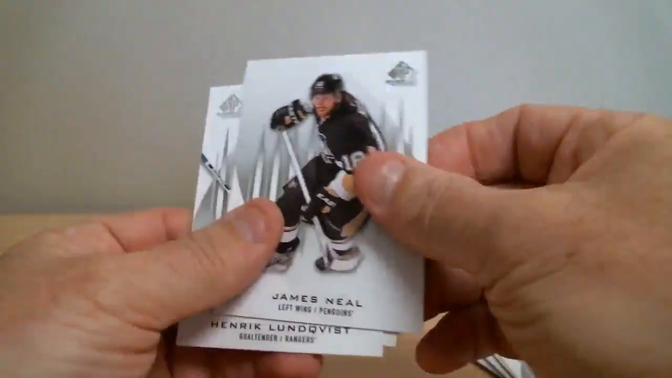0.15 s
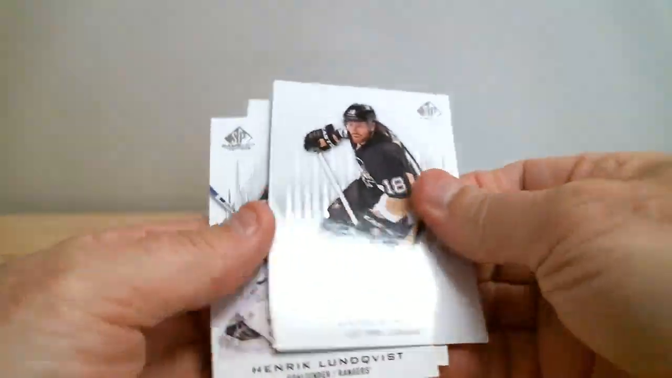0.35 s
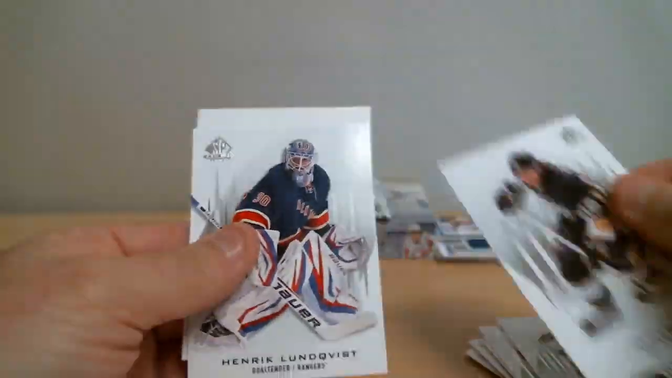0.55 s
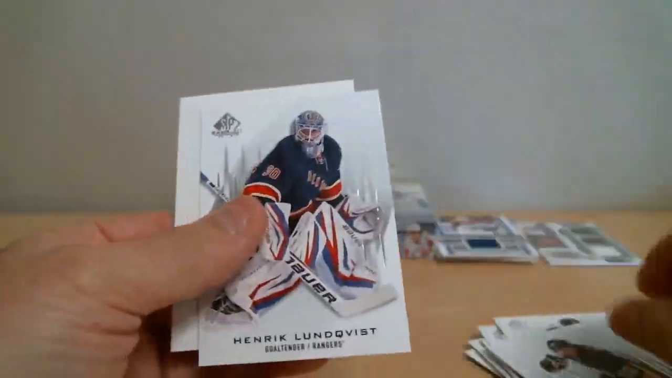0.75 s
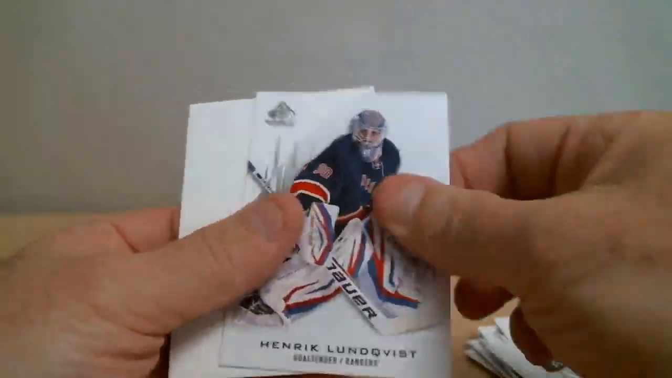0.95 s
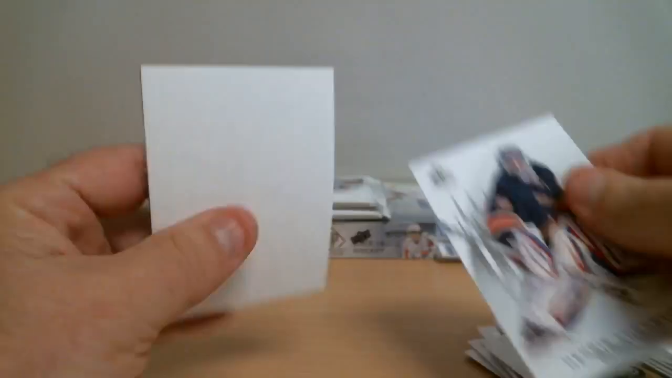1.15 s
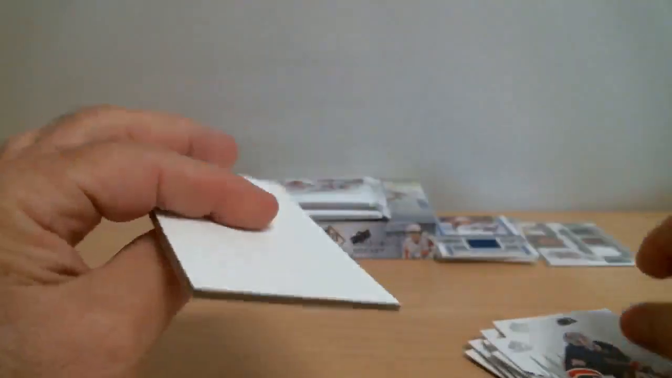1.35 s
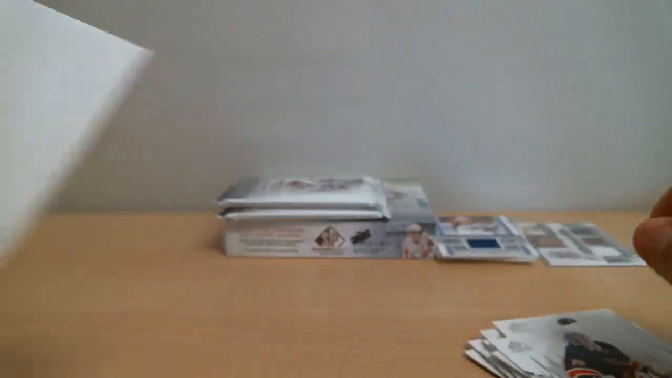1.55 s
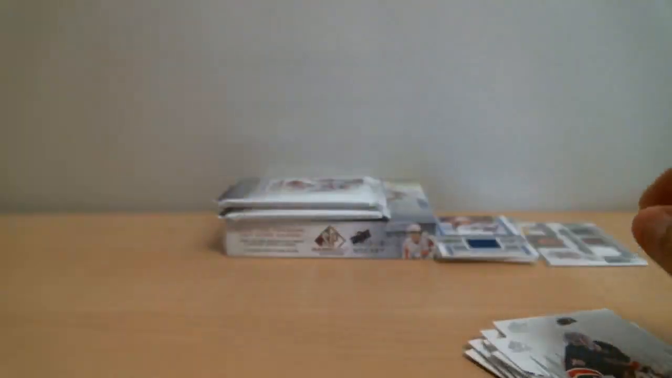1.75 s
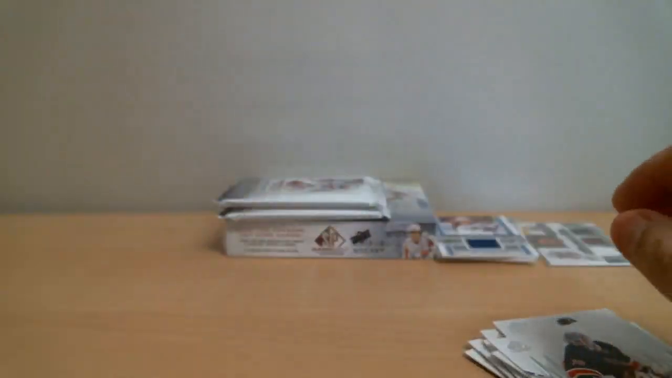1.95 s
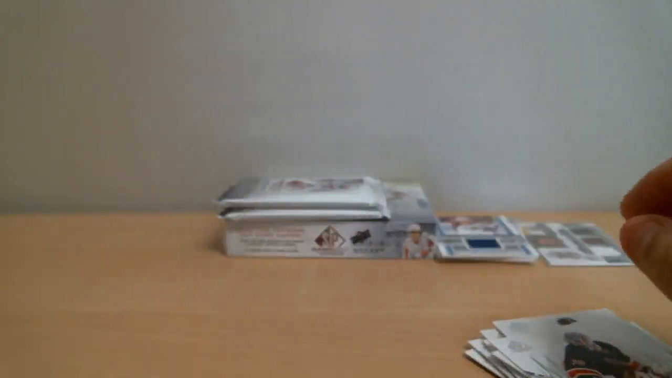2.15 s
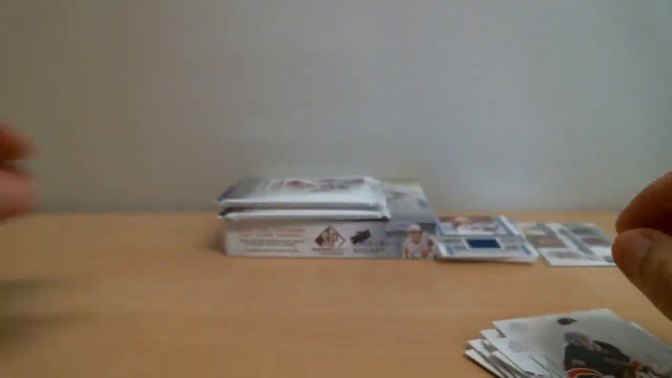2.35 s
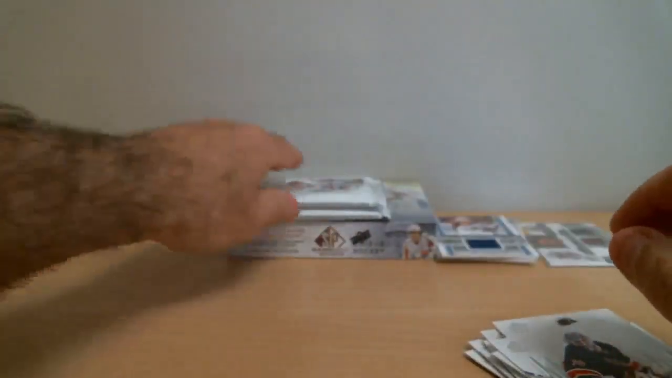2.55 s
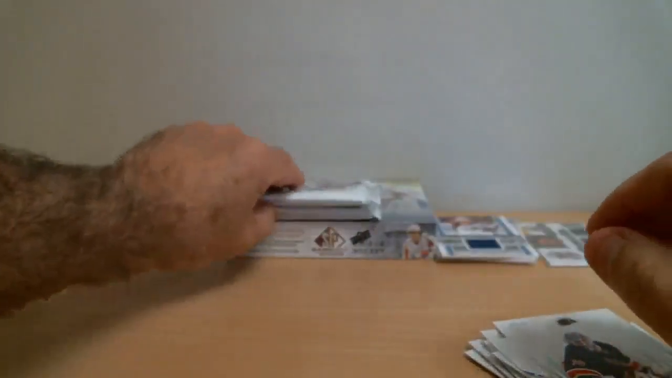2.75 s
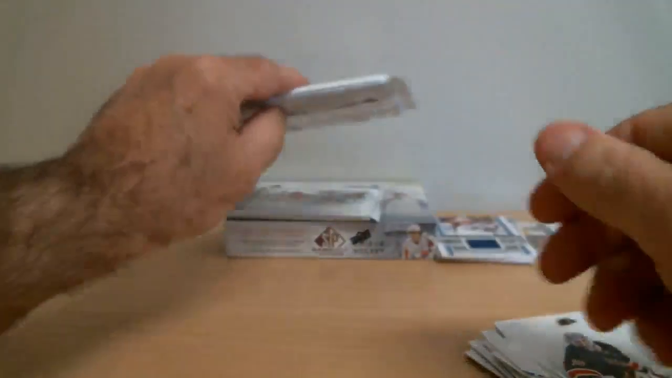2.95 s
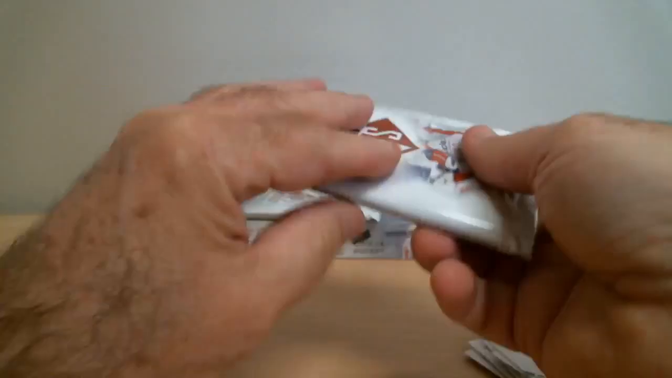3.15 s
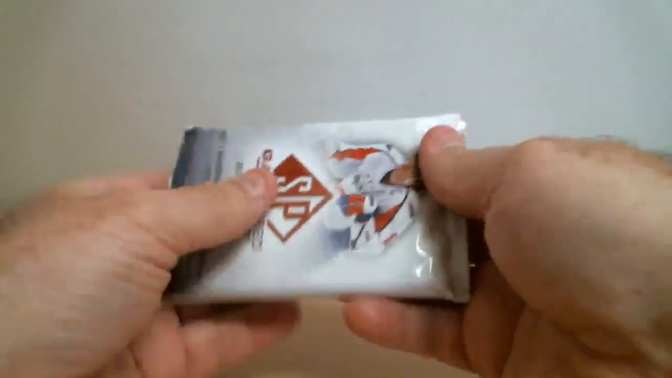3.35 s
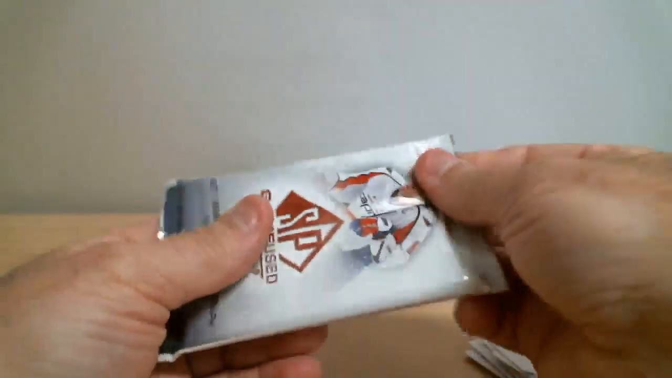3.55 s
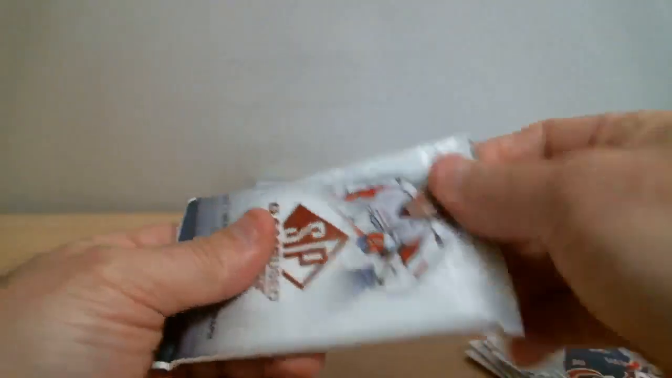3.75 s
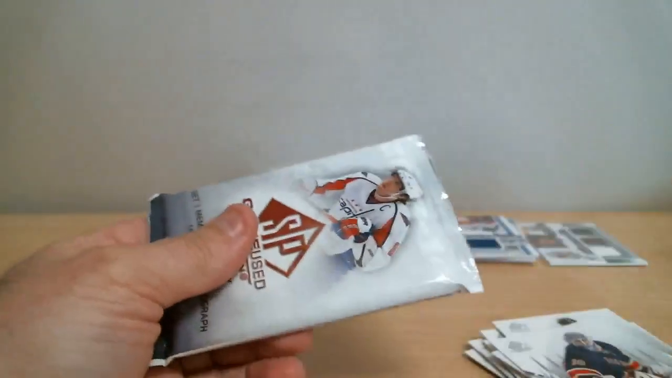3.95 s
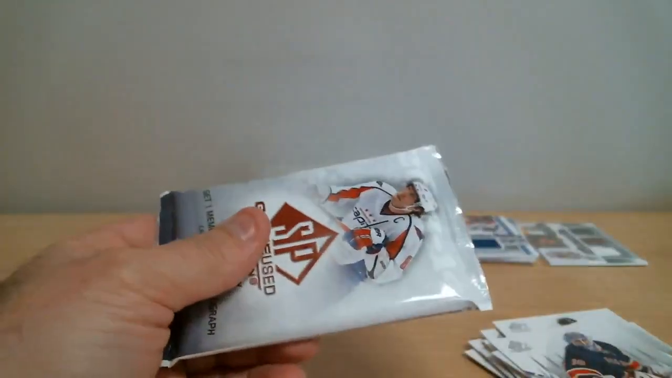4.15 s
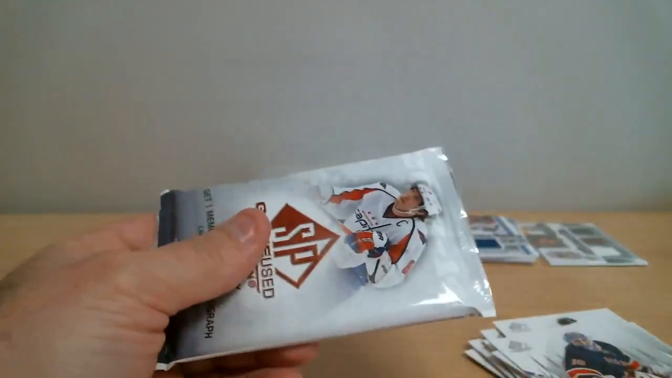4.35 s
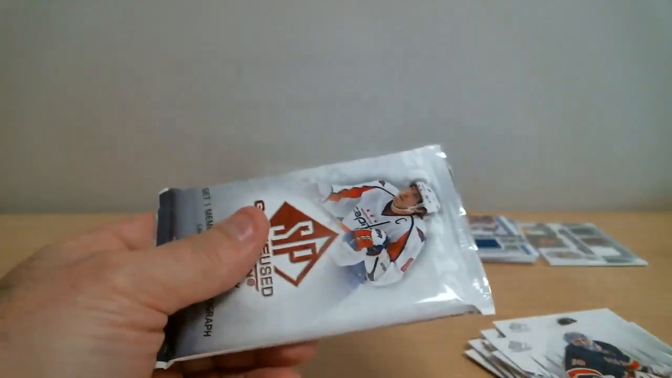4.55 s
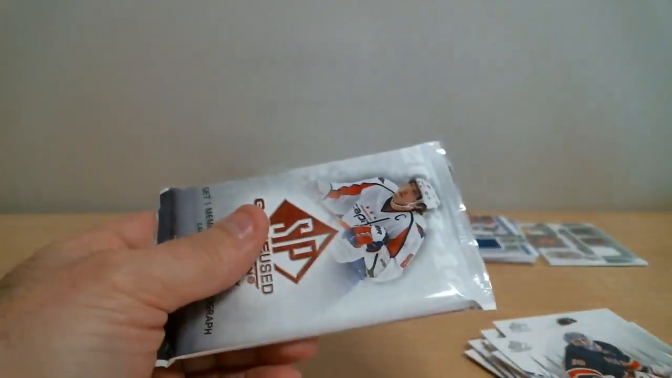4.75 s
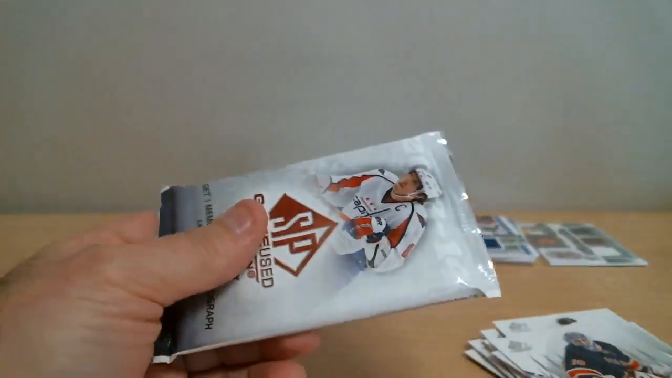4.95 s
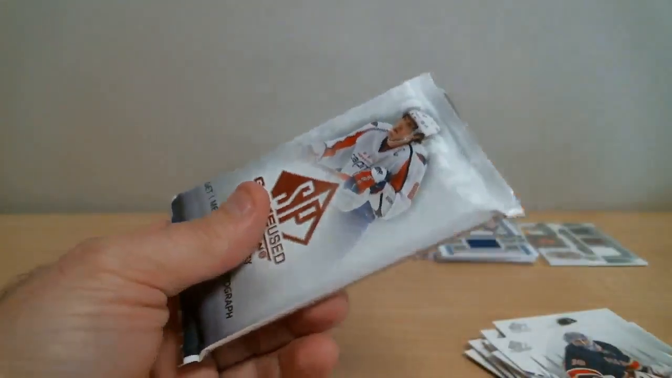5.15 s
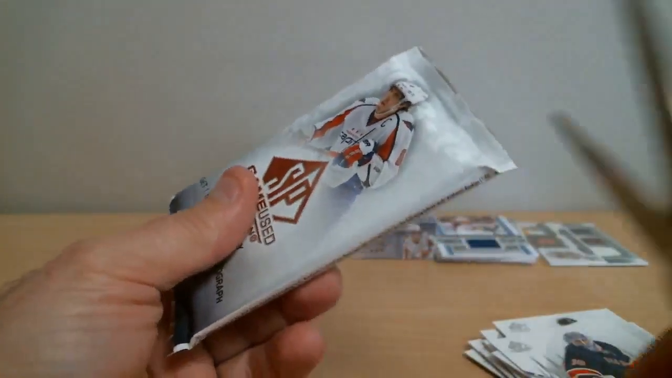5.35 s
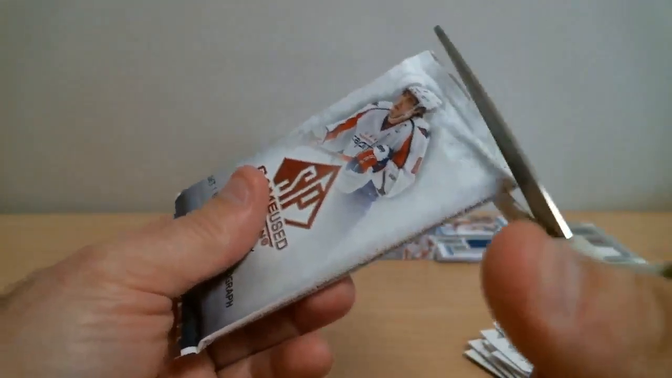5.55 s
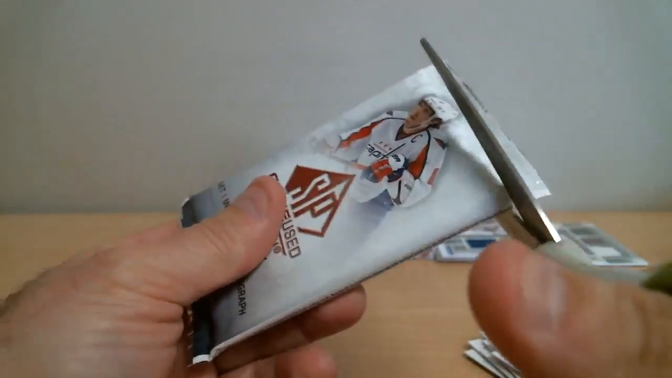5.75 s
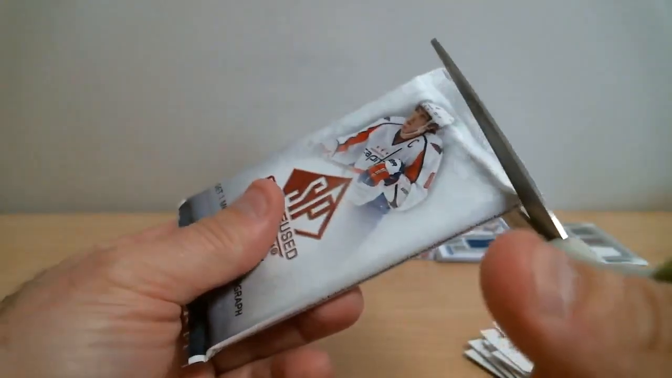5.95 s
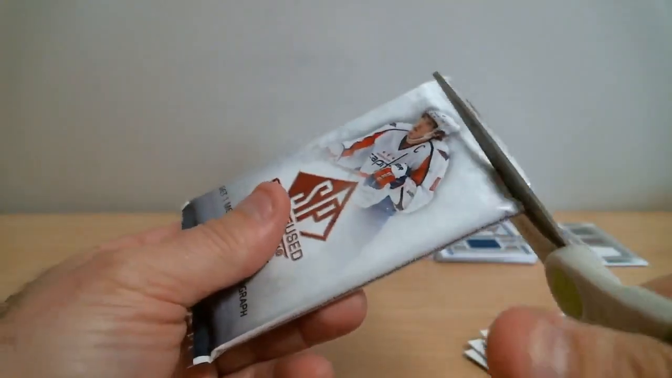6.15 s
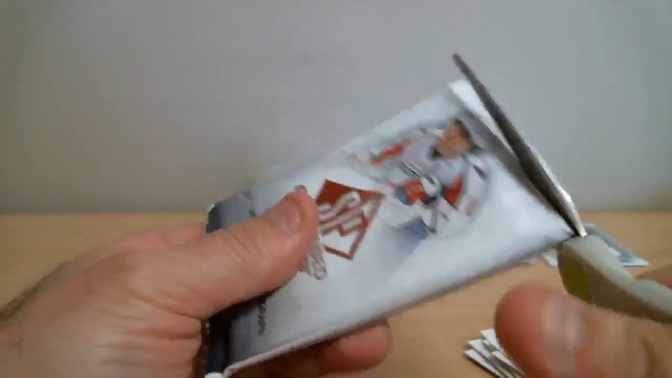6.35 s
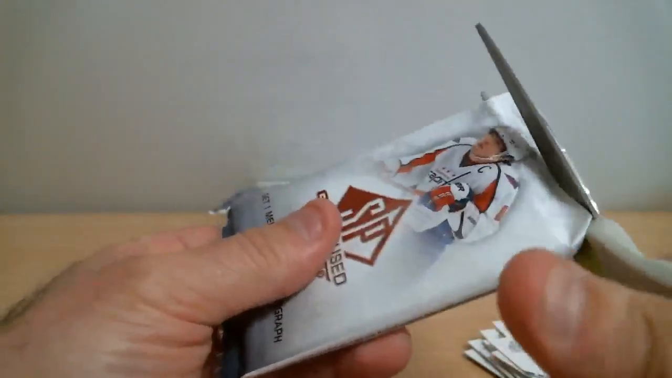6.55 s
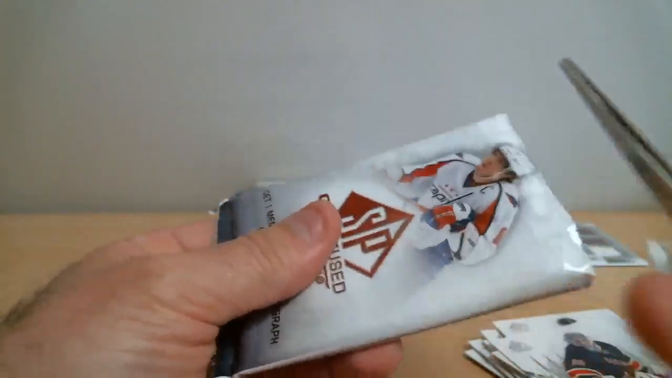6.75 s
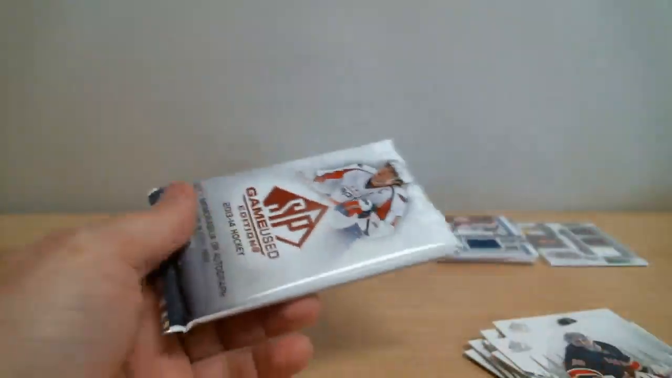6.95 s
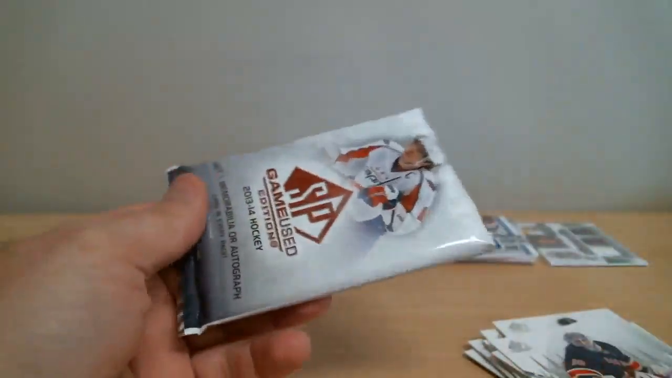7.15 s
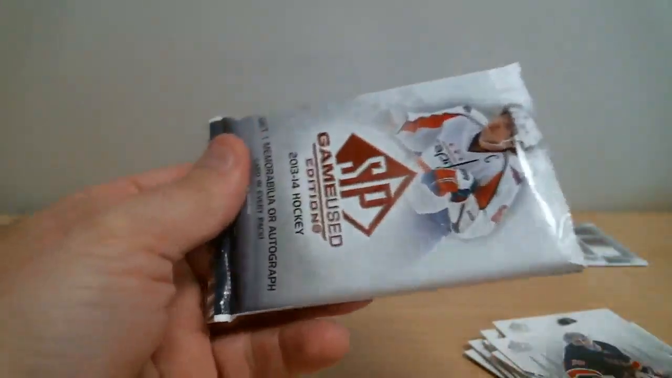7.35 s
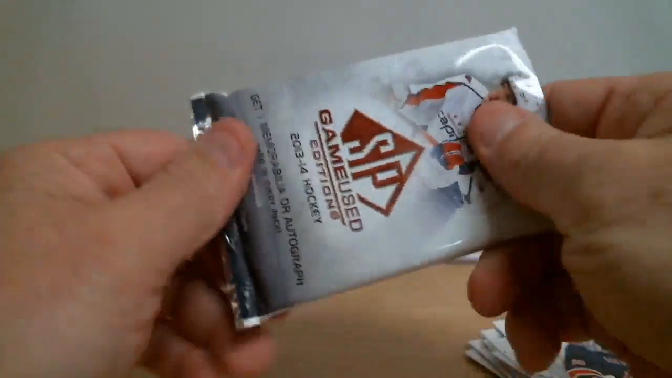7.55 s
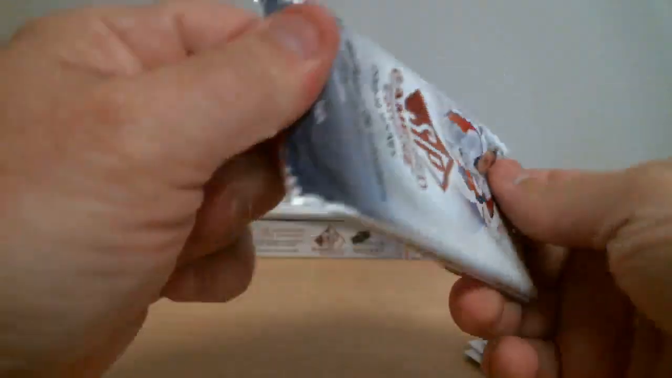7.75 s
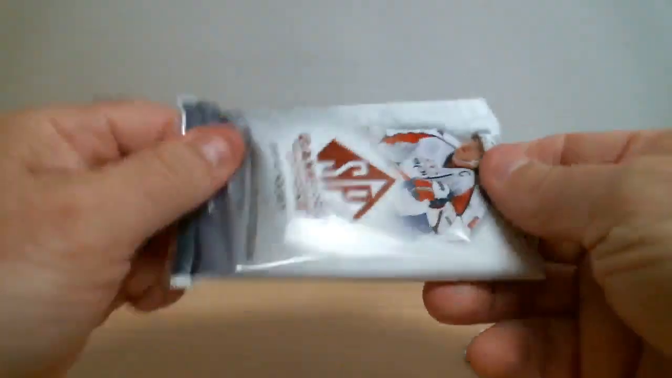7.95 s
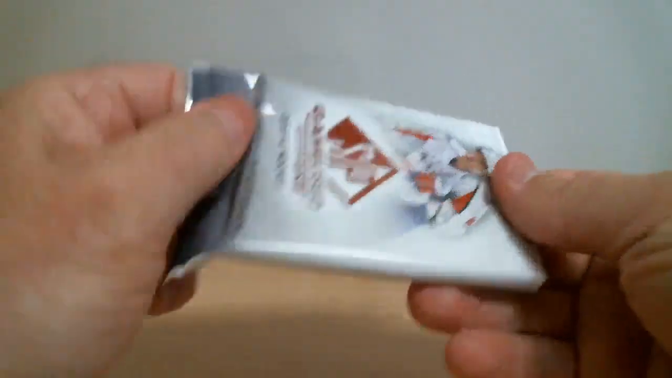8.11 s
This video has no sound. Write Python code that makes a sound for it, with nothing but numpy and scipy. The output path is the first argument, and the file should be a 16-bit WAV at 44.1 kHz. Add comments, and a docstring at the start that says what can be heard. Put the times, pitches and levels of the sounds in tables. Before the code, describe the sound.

A small quiet room with a low ventilation hum, hands very close to the microphone. From 0 to 1.7 s glossy cards slide with short hisses and flick free, sharpest around 0.55 to 0.75 and 1.3, with dull taps on a wooden table and a tiny finger squeak near 0.8. At about 2.0 come two or three firmer knocks, then faint brushing near 2.7. From 3.13 a foil pack is seized: an abrupt loud snap, then bright dense crinkling until 3.9. Scissors drag woodily off the table at 4.2 to 4.6; soft rubs and a small squeak follow near 5.1, a bump at 5.4. Light foil ticks lead to crunchy cuts at 6.0 to 6.45 and sharper ones at 6.6 to 6.7. At 7.2 the scissors land in a quick hard clatter and scrape. From 7.5 the wrapper crackles, swelling into loud, slightly clipped tearing crinkle to the end at about 8.3.

```python
"""A small quiet room, hands close to the microphone: glossy cards slide, flick and drop on a wooden table, a foil
pack is picked up, scissors are dragged off the table, cut the foil and are put down, and the wrapper crinkles open.
Foil creases ring one by one over a dense crackle; cards hiss in moving noise bands; contacts and drags shake the
table modes; fingertips squeak as gliding tones. Ventilation noise lies below; the loudest snaps clip."""
import sys
import numpy as np
from scipy import signal
from scipy.fft import rfft, irfft, next_fast_len
from scipy.io import wavfile
from scipy.ndimage import uniform_filter1d, map_coordinates

SR = 44100
rng = np.random.default_rng(int(sys.argv[2]) if len(sys.argv) > 2 else 0)


def transcribe(u):
    """Save the signal u as a 16-bit wav file named by the first command-line argument.

    u: samples, shape (n,) or (channels, n), limited to [-1, 1]; the rate is SR.
    q: integer samples, one column per channel.
    """
    v = np.clip(np.atleast_2d(u).T, -1, 1)
    q = np.round(v * 32767).astype(np.int16)
    wavfile.write(sys.argv[1], SR, q)


N = 365148  # samples

# table top modes: f/Hz, relative level/dB, t60/s (before the Q limit)
TABLE_MODES = [(70, -3.5, 0.24), (119, -1.5, 0.057), (157, 1, 0.056), (202, -2, 0.18), (286.4, 1, 0.14),
               (381, 4.5, 0.063), (471.6, -13.5, 0.028), (584, -9, 0.092), (700, -9, 0.073),
               (733, -1, 0.14), (956, -6, 0.032), (1185, 0.5, 0.014), (1302, -4.5, 0.057),
               (1710, 2.5, 0.034)]
# spectrum of foil noise: f/Hz, relative density/dB per Hz
FOIL_SPECTRUM = [(180, -49), (400, -37.5), (750, -19.5), (1100, 6.5), (1600, 4), (5410, 6), (9880, 3.5),
                 (15300, -11), (16300, -55)]


def amp(db):
    """Gain of a level in dB."""
    return 10 ** (np.asarray(db) / 20)


def unit(x):
    """Scaled to rms 1."""
    return x / np.sqrt(np.mean(x ** 2) + 1e-20)


def along(points, hz):
    """(f/Hz, value) points read on a log frequency axis."""
    f, v = np.transpose(points)[:2]
    return np.interp(np.log(hz + 1), np.log(f + 1), v)


def wobble(rate_hz):
    """Smooth random curve, rate_hz knots a second."""
    knots = rng.standard_normal(int(N * rate_hz / SR) + 4)
    return map_coordinates(knots, [np.arange(N) * rate_hz / SR])


def filtered(x, response):
    """x times a response of frequency, zero-padded."""
    length = x.shape[-1]
    m = next_fast_len(length + min(length, 8192))
    spectrum = rfft(x, m) * response(np.fft.rfftfreq(m, 1 / SR))
    return irfft(spectrum, m)[..., :length]


def resonance(f, hz, q):
    """Causal resonance of peak gain 1."""
    return 1j * f * hz / q / (hz * hz - f * f + 1j * f * hz / q)


def place(times_s, rows):
    """Rows of samples summed in at their times."""
    start = np.round(np.asarray(times_s) * SR).astype(int)
    at = start[:, None] + np.arange(rows.shape[1])
    return np.bincount(at.ravel(), rows.ravel(), N + SR)[:N]


def patchy(depth_db):
    """Noise whose colour shifts in random time-frequency patches."""
    z = signal.stft(rng.standard_normal(N), nperseg=256)[2]
    field = uniform_filter1d(rng.standard_normal(z.shape), size=5, axis=0)
    field = uniform_filter1d(field, size=8, axis=1)
    return signal.istft(z * amp(depth_db * unit(field)), nperseg=256)[1][:N]


def strokes(rows):
    """Level of overlapping gestures that swell and fade; further columns are led by the loudest gesture."""
    swing_db = 38.5  # swell over the rise, sink over the fall
    roundness = 1.267  # 1 = pointed peak, 2 = rounded swell
    t = np.arange(0, N + 32, 32) / SR
    power_sum = np.full(len(t), 1e-12)
    log_controls = np.zeros((len(rows[0]) - 4, len(t)))
    for peak_s, rise_s, fall_s, db, *values in rows:
        away = np.maximum((peak_s - t) / rise_s, (t - peak_s) / fall_s)
        power = amp(db - swing_db * away ** roundness) ** 2 + 1e-14
        power_sum += power
        log_controls += np.outer(np.log(values), power)
    curves = (np.sqrt(power_sum), *np.exp(log_controls / power_sum))
    return [np.interp(np.arange(N) / SR, t, c) for c in curves]


def clicks(events, colour, t60_s, q, wide_db, pop_hz):
    """Buckling sheets: a noise burst rings the patch round the crease; the whole sheet gives a low pop."""
    s, db, hz, pop_db = (c[:, None] for c in np.transpose(events))
    t = np.arange(1024) / SR
    chance = rng.standard_normal((len(s), len(t) + 2))
    sharp = amp(-60 * t / (t60_s * np.exp(chance[:, :1] / 4)))
    shiver = amp(-15.5 - 60 * t / 0.03)  # the sheet shivers on after the snap
    burst = chance[:, 2:] * (1 - np.exp(-t / 0.00024)) * (sharp + shiver)

    def patch(f):
        thin = (f / hz) ** 2 / (0.033 + (f / hz) ** 2)  # a small patch radiates no bass
        return amp(along(colour, f)) * thin * (amp(wide_db) + resonance(f, hz, q))

    def peak(rows):
        return rows / np.abs(rows).max(axis=1, keepdims=True)

    ring = filtered(burst, patch)
    sheet_hz = pop_hz * np.exp(0.16 * chance[:, 1:2])
    pop = filtered(burst, lambda f: resonance(f, sheet_hz, 2.05) ** 2)
    return place(s[:, 0], amp(db) * (peak(ring) + amp(pop_db - 8.0) * peak(pop)))


def air():
    """Ventilation noise with a few wavering tones."""
    # room noise: f/Hz, relative density/dB per Hz
    air_spectrum = [(15, -72), (25, -7), (114, -7), (175, -13), (212, 0), (249, -16), (285, -6.5),
                    (503, -14.5), (840, -21.5), (1480, -26.5), (4140, -36), (6210, -43), (9840, -38),
                    (16000, -50)]
    # faint fan tones: f/Hz, mean level/dB rms
    fan_tones = [(124, -70.5), (208, -82), (288, -66), (824, -76.5)]
    air_db = -58.5  # mean rms level
    t = np.arange(N) / SR
    noise = unit(filtered(rng.standard_normal(N), lambda f: amp(along(air_spectrum, f))))
    out = noise * amp(air_db + 0.6 * wobble(2.3))
    for hz, db in fan_tones:
        level = amp(db + 0.63 * wobble(36)) * np.sqrt(2)
        out += level * np.sin(2 * np.pi * hz * t + 1.2 * wobble(11))
    return out


def room(x):
    """Walls answer after a short gap, each frequency dying at its own speed; a fresh random tail every 0.25 s."""
    # wall reverberation: f/Hz, t60/s
    wall_decay = [(200, 0.2), (1500, 0.31), (5000, 0.12), (12000, 0.043)]
    wet, step = np.zeros(N + SR), SR // 4
    for at in range(0, N, step):
        hz, t, z = signal.stft(rng.standard_normal(SR // 2), SR, nperseg=256)
        decay = amp(-60 * t / along(wall_decay, hz)[:, None])
        tail = signal.istft(z * decay, SR, nperseg=256)[1]
        echo = signal.fftconvolve(x[at:at + step], tail / np.linalg.norm(tail))
        wet[at + 130:][:len(echo)] += echo  # gap in samples
    return wet[:N]


def squeaks():
    """Stick-slip tones that glide and waver under a smooth swell."""
    # fingertips on a smooth surface: centre t/s, length/s, peak level/dB, start f/Hz, end f/Hz (before waver)
    squeak_events = [(0.787, 0.025, -39, 420, 470), (0.817, 0.03, -40.5, 522, 398),
                     (5.06, 0.035, -36.5, 391, 514), (5.115, .06, -48, 401, 399),
                     (7.11, 0.067, -35, 578, 406)]
    out, waver = np.zeros(N), 1 + .035 * wobble(80)
    for s, length_s, db, start_hz, end_hz in squeak_events:
        u = np.linspace(0, 1, round(length_s * SR))
        start = round((s - length_s / 2) * SR)
        span = slice(start, start + len(u))
        hz = (start_hz + (end_hz - start_hz) * u) * waver[span]
        phase = 2 * np.pi * np.cumsum(hz) / SR
        out[span] += amp(db) * np.sin(np.pi * u) ** 2 * np.sin(phase)
    return out


def drags():
    """Rough rubbing shakes only the table modes nearest to the moving centre."""
    # hands and scissors dragging over the table: peak t/s, rise/s, fall/s, drive/dB, centre f/Hz
    drag_strokes = [(.02, 0.089, 0.046, -41.5, 352), (.77, .02, 0.052, -34.5, 332),
                    (.82, 0.023, 0.036, -48.5, 400), (1.15, .04, 0.019, -45, 600),
                    (1.5, .06, 0.095, -46.5, 446), (2.648, .03, 0.05, -42.5, 352),
                    (2.74, 0.025, .05, -49, 413), (3.235, 0.036, 0.048, -43.5, 130.4),
                    (4.15, 0.17, 0.076, -46, 480), (4.21, 0.071, 0.19, -29.5, 540),
                    (4.266, 0.022, 0.26, -23.5, 495), (4.4, .03, 0.11, -35, 418),
                    (4.568, .07, 0.073, -29.5, 535), (5.17, 0.086, 0.16, -37, 214.6),
                    (5.29, .06, 0.074, -44, 200), (5.39, 0.086, 0.061, -40, 211),
                    (5.795, .045, 0.29, -33.5, 161), (5.89, 0.17, 0.2, -43, 189),
                    (7.265, 0.0086, 0.22, -16, 576), (7.36, 0.13, 0.14, -26, 420)]
    level, centre_hz = strokes(drag_strokes)
    rub = rng.standard_normal(N) * amp(3 * wobble(45))
    modes = np.zeros(N)
    for hz, _, _ in TABLE_MODES:
        mode = unit(filtered(rub, lambda f: resonance(f, hz, 7.0) ** 2))
        modes += mode * amp(-3.5 - 71 * np.log(hz / centre_hz) ** 2)
    return level * modes


def knocks():
    """Each contact chatters briefly, cracks and shakes the table modes round its own centre."""
    # cards and scissors touching the table: t/s, drive/dB, crack re drive/dB (before trim), centre f/Hz
    contacts = [(0.546, -18.5, 1.5, 288), (0.674, -18.5, -1.5, 301), (0.7, -23, 6, 285),
                (0.735, -18, -11.5, 170), (1.27, -21, 7, 280), (1.35, -23.5, -29, 174),
                (1.976, -13.5, -19.5, 448), (1.987, -4.5, -4, 940), (2.05, -16.5, 8, 644),
                (2.064, -6.5, -17.5, 254), (4.202, -18.5, -32, 449.5), (4.226, -20, -7, 900),
                (4.264, -8, -12.5, 464.4), (4.397, -30.5, -20, 504), (5.427, -14.5, -15.5, 357),
                (6.953, -16, -12.5, 222), (7.181, -18, 3.5, 187.2), (7.194, -7.5, -8, 750),
                (7.218, -1, -5.5, 1138), (7.228, -2.5, -9.5, 920), (7.251, -7, -12, 576),
                (7.269, -14, -21, 568), (7.284, -16, 11.5, 1137), (7.298, 0, -14.5, 602)]
    # hard contact noise: f/Hz, relative density/dB per Hz
    crack_spectrum = [(590, -29), (1000, 6.5), (2340, 16), (4510, 12), (6710, 0.5), (11600, -29),
                      (13500, -48.5)]
    max_q = 11  # hands and cards lying on the table damp any sharper mode
    detune, soft_hz = .05, 3490  # each spot shifts the modes a little; the wood dulls the treble above soft_hz
    t = np.arange(4096) / SR
    hz, mode_db, t60_s = (c[:, None] for c in np.transpose(TABLE_MODES))
    q = np.minimum(np.pi * hz * t60_s / np.log(1000), max_q)
    rows = []
    for _, db, crack_db, centre_hz in contacts:
        strength = amp(mode_db - 6 * np.log(hz / centre_hz) ** 2) * np.sqrt(q / hz)
        spot_hz = hz * np.exp(detune * rng.standard_normal(hz.shape))
        chatter = rng.standard_normal((len(hz), len(t))) * amp(-60 * t / 0.031)
        modes = filtered(chatter, lambda f: strength * resonance(f, spot_hz, q) / (1 + 1j * f / soft_hz) ** 2)
        ring = modes.sum(axis=0)
        edge_hz = 9000 * amp(1.8 * crack_db)  # a soft contact cracks duller
        burst = rng.standard_normal(len(t)) * amp(-60 * t / 0.015)
        crack = filtered(burst, lambda f: amp(along(crack_spectrum, f)) / (1 + 1j * f / edge_hz) ** 2)
        ring_part = amp(-2.5) * ring / np.abs(ring).max()
        crack_part = amp(crack_db - 0.5) * crack / np.abs(crack).max()
        rows.append(amp(db) * (ring_part + crack_part))
    return place([row[0] for row in contacts], np.array(rows))


def cards():
    """Sliding faces hiss in a band that moves with speed and contact; corners flick."""
    # fingers, card faces and blades on card, foil and table: peak t/s, rise/s, fall/s, drive/dB, centre f/Hz
    slide_strokes = [(0.0, .05, .2, -31, 2000), (.39, .15, 0.3, -39, 5200),
                     (.45, 0.061, 0.041, -30.5, 3200), (.52, 0.051, 0.062, -39, 2920),
                     (.546, 0.0055, 0.013, -36, 2980), (.64, 0.036, .06, -52.5, 6000),
                     (.7, 0.084, 0.094, -39, 2220), (1.11, 0.11, 0.082, -28.5, 3630),
                     (1.2, 0.045, 0.27, -41.5, 5250), (1.282, 0.089, 0.027, -30, 1990),
                     (1.344, 0.038, 0.034, -27.5, 4700), (1.53, 0.077, 0.088, -48, 7000),
                     (1.655, 0.078, .07, -46, 5140), (2.0, .02, .15, -42, 2000),
                     (2.07, 0.018, 0.2, -40.5, 1940), (2.66, 0.026, 0.2, -39.5, 2200),
                     (2.73, 0.09, 0.093, -41.5, 5900), (2.84, 0.089, 0.13, -46.5, 7000),
                     (2.885, 0.054, .04, -41, 2970), (4.2, .04, 0.084, -58, 1280),
                     (4.235, 0.011, 0.069, -28.5, 2360), (4.3, 0.049, .25, -66, 1210),
                     (4.585, 0.049, 0.067, -36, 2820), (4.61, 0.013, 0.05, -35, 3050),
                     (4.66, 0.0049, 0.1, -35, 3000), (5.48, 0.043, 0.118, -58, 1380),
                     (6.97, .02, 0.22, -40.5, 1290), (7.183, 0.0028, 0.041, -13.5, 2480),
                     (7.225, .02, 0.2, -21.5, 1780), (7.31, 0.17, 0.19, -30.5, 1320)]
    # corners flicking free, small ticks: t/s, ring peak/dB, ring f/Hz, pop re ring/dB (before trim in clicks)
    flick_events = [(0.0935, -25.5, 2600, -28), (0.203, -32, 2920, -48), (0.327, -25.5, 8300, -37),
                    (0.5456, -6.5, 2520, -7), (0.6749, -16, 2170, -22), (0.7218, -19.5, 3320, -50),
                    (0.7351, -17, 2000, -5), (1.005, -16, 1900, -16), (1.2711, -15, 1980, -8),
                    (1.343, -26, 6660, -49), (1.577, -35.5, 3800, -12), (2.6465, -27, 1800, -14),
                    (2.682, -34, 3000, -30), (2.733, -32, 1900, -20), (2.845, -31, 2450, -30),
                    (2.905, -41, 4030, -38.5), (4.2267, -22.5, 2500, -19), (4.9456, -44, 5100, -36),
                    (5.0234, -44.5, 5100, -40), (7.162, -33, 5000, -42)]
    # spectrum of card noise: f/Hz, relative density/dB per Hz
    card_spectrum = [(530, -8), (900, -5), (1120, -8.5), (1410, -1.5), (2040, -3), (3150, -2), (7770, -2.5),
                     (12300, -1), (16000, -53)]
    level, centre_hz = strokes(slide_strokes)
    rub = filtered(patchy(depth_db=2.5), lambda f: amp(along(card_spectrum, f)))
    rub = rub * amp(3.9 * wobble(70) + 1.6 * wobble(300))
    hiss = np.zeros(N)
    for hz in 1300 * np.sqrt(2) ** np.arange(7):  # half-octave bands
        band = filtered(rub, lambda f: resonance(f, hz, 1.0) ** 2)
        hiss += band * amp(-1.5 - np.minimum(9 * np.log(hz / centre_hz) ** 2, 22))
    flicks = clicks(flick_events, card_spectrum, t60_s=0.0018, q=2.0, wide_db=-36.0, pop_hz=775)
    return level * hiss / np.std(rub) + flicks


def crackle(count, spread_db):
    """Small creases at random times, coming in clumps, a few far larger than the rest."""
    rarest = .01  # keeps the chance creases below the loud snaps
    busy = np.cumsum(amp(6.4 * wobble(40)))
    when, size, pitch = rng.random((count, 3)).T
    s = np.interp(when * busy[-1], busy, np.arange(N)) / SR
    peak_db = -spread_db * np.log(size + rarest)
    rows = np.transpose([s, peak_db, 2200 * 4.5 ** pitch, np.full(count, -22.)])
    return unit(clicks(rows, FOIL_SPECTRUM, t60_s=.005, q=6, wide_db=-10.5, pop_hz=1045.4))


def foil():
    """Loud snaps over crackle and a thin rustle; a light touch only slides and moves small, bright patches."""
    # loudest foil creases buckling: t/s, ring peak/dB, ring f/Hz
    snap_events = [(3.1378, -10, 3353), (3.1459, -1.8, 3464), (3.1562, -2.5, 4110), (3.158, 16.5, 4010),
                   (3.1711, 0.5, 2410), (3.186, -10.5, 4295), (3.1954, -8, 2770), (3.2286, -4, 5440),
                   (3.2641, -3, 3363), (3.3242, -1.4, 5870), (3.3286, 4.5, 3375), (3.333, -1.5, 4404),
                   (3.4347, -9.5, 4330), (3.4499, -8, 2970), (3.4594, -2, 4425), (3.4849, 3.5, 4240),
                   (3.5243, 3.3, 9740), (3.5345, -0.5, 8330), (3.5964, -12.5, 4570), (3.62, -15, 2764),
                   (3.6326, 7.5, 2850), (3.6379, -0.4, 3810), (3.6504, 2.5, 10750), (3.6601, -0.5, 3220),
                   (3.6818, 0.5, 3967), (3.691, 0.5, 5800), (3.7461, -7, 2897), (3.7596, -6.5, 5416),
                   (3.7685, 0.5, 3840), (3.7826, 0, 5630), (3.7973, 2.5, 5620), (3.8092, 1.5, 3230),
                   (3.8165, -2, 2790), (3.8253, 3, 8530), (3.8309, 3, 4100), (3.8508, 2.5, 4380),
                   (3.87, -10.5, 4506), (3.8812, -5.5, 3950), (4.658, -23, 4140), (5.6242, -22.5, 5700),
                   (5.7496, -17.5, 4050), (5.9543, -17, 2830), (6.0415, -3, 6330), (6.1035, -1, 8000),
                   (6.1155, -10, 2860), (6.1861, 1, 6710), (6.1897, 2, 3007), (6.2075, 5.5, 3360),
                   (6.2218, -4.7, 4740), (6.2305, 4.5, 3817), (6.2504, 2.5, 9120), (6.2564, -1, 3790),
                   (6.2776, -3.5, 6000), (6.3183, -5, 4940), (6.3286, -5.5, 2480), (6.3354, -2.5, 2790),
                   (6.374, -5, 2760), (6.406, -0.5, 2680), (6.417, -4.5, 3550), (6.4304, -5.5, 3000),
                   (6.4893, -14, 3800), (6.5299, -12.5, 3100), (6.5601, -15.5, 1770), (6.625, 4, 9340),
                   (6.644, 3.5, 4100), (6.66, 10.5, 8430), (6.6926, 0.5, 9630), (6.7053, 10.5, 8830),
                   (6.717, 6.5, 6270), (6.9125, -16, 4330), (6.9902, -19.5, 2400), (7.5013, -14, 3260),
                   (7.51, -10.5, 7500), (7.5257, -2.5, 3400), (7.5449, -9, 3657), (7.5546, -5, 3620),
                   (7.6574, 1, 3810), (7.6961, -6.5, 4460), (7.7139, -1.5, 5060), (7.7491, 2.6, 6050),
                   (7.7569, 2.5, 4930), (7.7693, 7, 4865), (7.7992, 6.5, 5140), (7.8466, -15.5, 2580),
                   (7.861, 1, 3440), (7.882, 10.5, 3085), (7.8963, -0.5, 2466), (7.9043, 4.5, 2143),
                   (7.9241, -2, 2270), (7.9511, -0.5, 5020), (7.988, 0.5, 3180), (7.9957, 1.1, 2760),
                   (8.0004, -2, 5040), (8.0112, 0, 4380), (8.0259, 5, 1917), (8.037, -5.5, 5774),
                   (8.0545, 4.5, 9700), (8.0724, 0.9, 6500), (8.0777, 6, 2400), (8.1144, 3, 4820),
                   (8.1422, 4.5, 3024), (8.1539, 4.5, 5120), (8.208, -7.5, 5260), (8.2156, 3, 4000),
                   (8.2192, 5, 3330), (8.2357, 1, 8130), (8.2435, 0, 5260), (8.2662, -1, 4660),
                   (8.271, -0.5, 4774)]
    # squeezes and cuts that crumple the foil: peak t/s, rise/s, fall/s, drive/dB
    grip_strokes = [(3.15, 0.019, 0.17, -18.5), (3.27, 0.093, 0.25, -24), (3.47, 0.21, 0.48, -26),
                    (3.645, 0.058, 0.3, -26), (3.77, 0.04, 0.25, -27), (3.84, 0.13, .13, -17),
                    (5.69, 0.059, 0.24, -47), (5.79, .06, 0.34, -46), (5.95, 0.086, 0.081, -42),
                    (6.15, 0.16, .1, -41), (6.21, 0.052, 0.19, -18.5), (6.4, 0.18, .2, -22.5),
                    (6.625, 0.065, 0.059, -17.5), (6.66, .03, .05, -19.5), (6.71, 0.081, 0.079, -17.5),
                    (6.76, .1, 0.19, -35), (6.84, 0.084, 0.17, -41), (6.95, 0.13, 0.11, -46),
                    (7.085, .05, 0.029, -50), (7.53, 0.046, 0.17, -26.5), (7.62, 0.12, .15, -36),
                    (7.76, .1, 0.23, -18.5), (7.885, 0.092, 0.13, -16.5), (8.03, 0.24, 0.14, -16),
                    (8.12, 0.019, 0.19, -16.5), (8.27, .1, 0.18, -11)]
    firm_db = -26.5  # drive of a firm grip
    # snap pop re ring at a firm grip, before trim in clicks; dB per dB of weaker grip; random scatter
    pop_firm_db, pop_slope, pop_scatter_db = -18, 0.74, 4.5
    level, = strokes(grip_strokes)
    firm = level / (amp(-48.0) + level)
    rustle = unit(filtered(patchy(depth_db=3.0), lambda f: amp(along(FOIL_SPECTRUM, f))))
    rustle = rustle * amp(1.6 * wobble(60))
    bed = amp(2.5) * firm * crackle(count=1100, spread_db=4) + amp(-5.5) * rustle
    low = filtered(bed, lambda f: 1 / (1 + (f / 2200) ** 6))
    bed = bed - (1 - firm) * low  # a light touch loses its lows
    at = [round(row[0] * SR) for row in snap_events]
    grip_db = 20 * np.log10(level[at]) - firm_db
    pop_db = pop_firm_db + pop_slope * np.minimum(grip_db, 0)
    pop_db = pop_db + pop_scatter_db * rng.standard_normal(len(snap_events))
    rows = np.c_[snap_events, pop_db]
    snaps = clicks(rows, FOIL_SPECTRUM, t60_s=.003, q=5.5, wide_db=-7.5, pop_hz=755)
    return snaps + level * bed


def scene():
    """Near hands are dry, the table further off is wetter."""
    table = squeaks() + drags() + knocks()
    near = cards() + foil()
    echo = room(amp(-22.5) * near + amp(-10) * table)
    return (air() + echo + table + near)[None]


def record(dry):
    """A small capsule that loses the bass, a converter that clips, a band limit."""
    mic_hz, top_hz = 59.6, 16468
    heard = filtered(dry, lambda f: (1j * f / (mic_hz + 1j * f)) ** 2)
    clipped = heard / (1 + np.abs(heard) ** 8) ** (1 / 8)
    return filtered(clipped, lambda f: f < top_hz)


dry = scene()
out = record(dry)
transcribe(out)
```